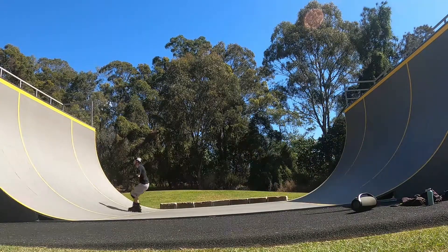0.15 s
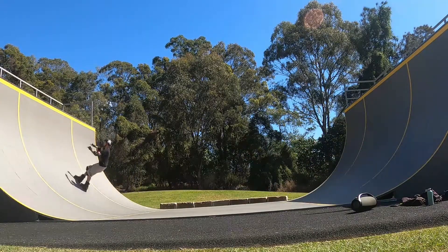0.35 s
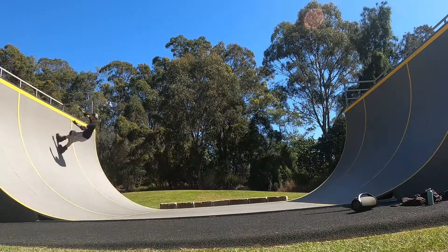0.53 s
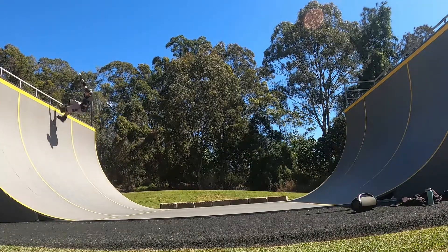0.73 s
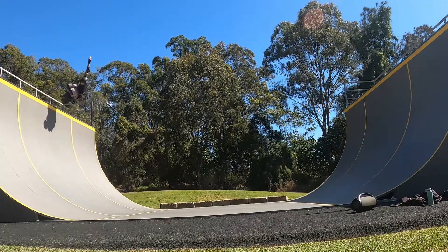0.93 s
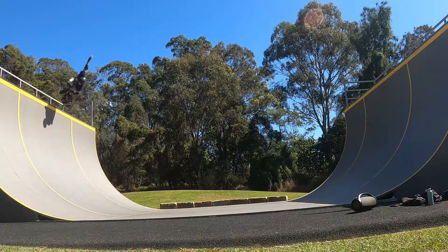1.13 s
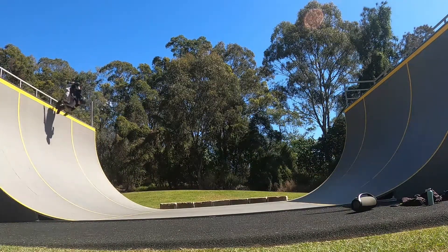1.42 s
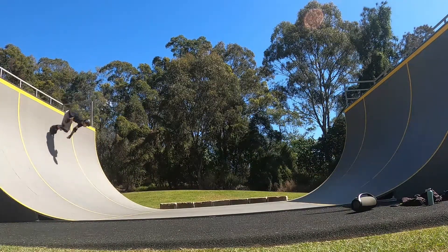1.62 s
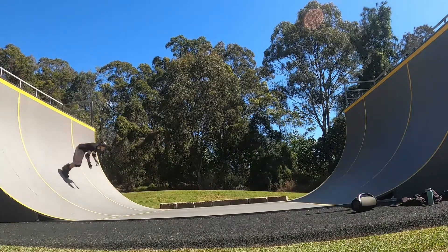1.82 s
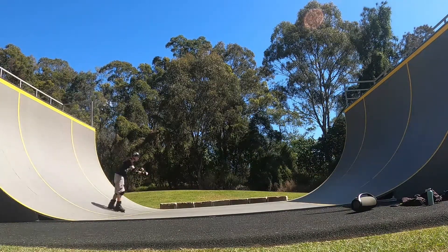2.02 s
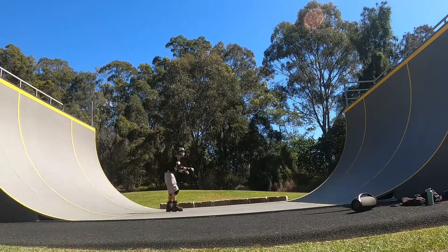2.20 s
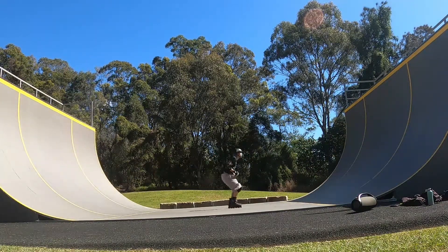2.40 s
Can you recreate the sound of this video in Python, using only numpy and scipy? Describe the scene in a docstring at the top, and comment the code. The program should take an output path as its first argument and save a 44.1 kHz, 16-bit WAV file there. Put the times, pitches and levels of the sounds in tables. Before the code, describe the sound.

Inline skate wheels rumble and knock up a hollow outdoor half-pipe. The sound eases during a jump, then the skates land with a sharp clack and roll back down. Light wind lies behind, and it all sounds somewhat muffled.

```python
"""Wheels rumble on a hollow deck as an inline skater climbs an outdoor half-pipe, flies above the lip,
lands with a clack and rolls back down. Bumps force the deck's resonances and grit excites a roar and
hiss in the skates, hardest in the curve; each blow leaves both in damped free vibration. In the air the
deck rumbles on and the free wheels whine, sagging as they slow. Light wind, trees and a far bird lie
behind. The sound is muffled, with a hollow ring above 1 kHz, and is heard at two microphone ports."""
import sys
import numpy as np
from scipy import signal
from scipy.fft import rfft, irfft
from scipy.io import wavfile
from scipy.ndimage import uniform_filter1d

SR = 44100
rng = np.random.default_rng(int(sys.argv[2]) if len(sys.argv) > 2 else 0)


def master_out(mix):
    """Clip the mix to full scale and print it as 16-bit PCM to the path in sys.argv[1]."""
    frames = np.transpose(np.atleast_2d(mix))
    ceiling = np.clip(frames, -1, 1)
    pcm = np.round(ceiling * 32767).astype(np.int16)
    wavfile.write(sys.argv[1], SR, pcm)


N = 112455

# wheel contact going up and coming down: t/s, deck rumble/dB, roar/dB, hiss/dB, deep boom/dB
CLIMB_CONTACT = [(0, -38.5, -62, -70, -32), (0.102, -38, -89, -72.5, -54), (.23, -41, -61, -73.5, -42),
                 (0.299, -45, -61, -76, -38), (0.314, -53, -49.5, -59, -43.5),
                 (0.369, -28.5, -56.5, -61.5, -35.5), (0.44, -31, -48.5, -61.5, -38),
                 (.52, -30.5, -42.5, -53.5, -38.5), (0.632, -28, -45.5, -54, -38.5),
                 (0.709, -29, -46, -54, -33.5), (0.81, -34.5, -57.5, -67, -43.5),
                 (0.999, -43, -66, -70, -47), (1.14, -46.5, -68, -78, -43),
                 (1.3, -51.5, -83.5, -104.5, -53)]
DESCENT_CONTACT = [(1.725, -34, -45.5, -50, -36), (1.786, -29, -44, -54.5, -30),
                   (1.849, -31, -53, -63.5, -43), (1.955, -39, -54, -65.5, -39.5),
                   (1.965, -35.5, -46.5, -56, -36.5), (2.108, -26, -44, -49, -44),
                   (2.23, -30.5, -47.5, -59, -33.5), (2.352, -32.5, -58, -65.5, -40),
                   (2.55, -43, -64.5, -77, -33)]
# low and high modes of the deck, narrow modes of the skates: f/Hz, bandwidth/Hz, relative level/dB
DECK_LOW_MODES = [(63.8, 6.7, -1.5), (97.7, 20, -1), (129.7, 44, -0.5), (179.3, 26, 2.5), (209, 12, -5),
                  (297, 29, -11.5)]
DECK_HIGH_MODES = [(290, 25, 0.5), (399, 200, -3.5), (485, 21, -11.5)]
SKATE_MODES = [(948, 30, -2), (1094, 20, 2), (1210, 20, -3), (1317, 30, -1), (1615, 30, -3), (1951, 20, -3),
               (2256, 20, -3), (3080, 100, -4), (5200, 100, -8)]
# spectral envelopes of the noises and impacts: f/Hz, relative spectral level/dB
ROAR_SPECTRUM = [(640, -18.5), (760, -19), (920, -9.5), (1090, 0.5), (1200, -5.5), (1350, 0.5), (1560, -11),
                 (1750, -17), (2300, -21.5)]
HISS_SPECTRUM = [(1180, -35.5), (2000, -33.5), (2660, -10), (3100, 2.5), (3330, -4.5), (3750, -9),
                 (4110, -1), (4330, -9.5), (4580, 3), (5160, 0.5), (5780, -7), (5940, -14.5), (6470, -12),
                 (7210, -27), (7760, -24), (10100, -53), (17100, -120)]
WIND_SPECTRUM = [(25, -33), (45, -5.5), (65, 4), (92, 7), (130, -2.5), (200, -6.5), (300, -16.5),
                 (400, -17), (520, -39), (700, -37.5)]
TREE_SPECTRUM = [(720, -26.5), (900, -9.5), (1080, 2.5), (1330, 4.5), (1500, 2.5), (1680, -8), (2200, -15),
                 (2800, -12.5), (3400, -8.5), (4200, -11), (5100, -8), (5800, -22.5), (6150, -21),
                 (6500, -27.5), (8000, -43.5), (11000, -54)]
THUD_SPECTRUM = [(30, -25), (80, -27.5), (130, -5.5), (165, 1), (260, -7), (370, -22.5), (500, -19.5),
                 (700, -38.5), (1200, -60.5)]
CLACK_SPECTRUM = [(500, -18.5), (730, -15.5), (950, -6.5), (1100, -4.5), (1230, -18), (1420, -8.5),
                  (1750, -12.5), (2200, -18), (2500, -19.5), (3080, -11), (4000, -19), (5100, -19),
                  (6550, -19.5), (7200, -28), (8300, -41.5), (10000, -47.5), (12500, -63)]
TAP_SPECTRUM = [(1100, -2), (1300, 3), (1550, -3), (1900, 0), (2300, -9), (3100, -7), (4000, -18)]
# wheel rotation: t/s, speed/take-off speed
WHEEL_SPIN = [(1.1, 1), (1.48, .993), (1.56, 1), (1.7, .985)]
# tones of the free bearings: f/Hz, wander width/Hz, level/dB, swell time/s, swell/dB
BEARING_TONES = [(1124, 6, -65, 1.61, 4), (1322, 7, -64.5, 1.22, 3.5), (1507, 7, -64.5, 1.42, 4.5)]
# sizzle of the wheels on the flat: f/Hz, bandwidth/Hz, relative level/dB
SIZZLE_BANDS = [(6150, 500, 0), (6900, 700, -6), (7900, 900, -7), (9300, 1200, -17)]
# hum of the curved panels: t/s, f/Hz, level/dB
PANEL_HUM = [(0.242, 92.53, -49), (.275, 97.3, -30.5), (0.299, 107.6, -29), (0.313, 144, -27.5),
             (0.389, 150.1, -30), (0.439, 163.2, -37), (0.479, 165.1, -26), (.54, 175.6, -28.5),
             (0.619, 178.2, -38.5), (0.721, 177, -45), (0.852, 169, -79)]
# wheel slips in the curve and at touchdown: t/s, level/dB
WHEEL_SLIPS = [(.302, -49), (.331, -54), (.499, -43), (0.527, -43), (.576, -49), (.597, -50), (.622, -47.5),
               (1.72, -37), (2.018, -50), (2.085, -46), (2.105, -47), (2.12, -44.5)]
# skates striking the deck: t/s, relative thud level/dB, relative clack level/dB
IMPACTS = [(0.303, -21.5, -29.5), (0.471, -12, -21), (0.499, -12, -16), (0.528, -6.5, -17),
           (.576, -15, -16), (.616, -12.5, -14), (0.658, -16, -14.5), (0.73, -7.5, -26), (1.7186, -3, -4),
           (1.731, 1, -3.5), (1.7439, -5, -2.5), (1.771, -5, -14), (1.8169, -6, -21.5), (1.841, -8.5, -19),
           (1.959, -27.5, -20.5), (2.15, -5.5, -18)]
# modes of ramp and skates left ringing by a blow: f/Hz, relative level/dB, T60/s
IMPACT_MODES = [(232, 9, .08), (339, 2, .17), (505, 4, .06), (940, -8, .2), (1093, -1, .4), (1394, -9, .3),
                (1625, -12, .2), (1951, -7, .13), (2256, -6, .14), (3090, -5, .05)]
# far bird whistles: t/s, duration/s, start f/Hz, end f/Hz, arch/Hz, level/dB
BIRD_NOTES = [(.92, .37, 6110, 6100, 0, -82), (1.272, .09, 6250, 5650, 170, -71),
              (1.405, 0.115, 4720, 4510, -35, -66)]
# dry taps in mid-air: t/s, level/dB
AIRBORNE_TAPS = [(1.194, -54)]
# two microphone ports: f/Hz, left minus right/dB, left lead/rad, diffuse share/dB
PORT_RESPONSE = [(97, 1.5, 0.02, -29), (400, 2, 0.22, -23), (750, 4, 0.07, 2.5), (1060, 1.5, 0.5, -16),
                 (1350, 8.5, 1, -13), (1700, -4.5, -0.5, -12.5), (2170, 0.5, -1.3, -7),
                 (2830, 11.5, -1.3, -14.5), (3330, 0, -0.5, -5), (4150, -6.5, -0.1, 2),
                 (4900, -15, -2, -7.5), (5400, -6, 0.3, -3), (6510, -4.5, 1.25, -4.5), (7870, 14.5, 1, -10)]

TAKE_OFF_S, LANDING_S = .8, DESCENT_CONTACT[0][0]
RUMBLE_COLUMN, ROAR_COLUMN, HISS_COLUMN, BOOM_COLUMN = 1, 2, 3, 4
t = np.arange(N) / SR
f = np.maximum(np.arange(N + 1) * SR / (2 * N), 1)


def undb(db):
    """Amplitude ratio of a level in decibels."""
    return 10 ** (np.asarray(db) / 20)


def unit(x):
    """Normalisation to rms 1."""
    return x / np.sqrt(np.mean(x ** 2))


def noise():
    """Gaussian white noise."""
    return rng.standard_normal(N)


def wander(per_s):
    """Smoothed random steps give a slow modulation with a spread near 1."""
    hold = int(SR / per_s)
    steps = np.repeat(noise()[:N // hold + 1], hold)
    return 1.17 * uniform_filter1d(uniform_filter1d(steps, hold), hold)[:N]


def through(x, response):
    """Linear filtering: the spectrum is multiplied by a frequency response."""
    return irfft(rfft(x, 2 * N) * response)[..., :N]


def across(points, column=1):
    """Interpolation of a table column along log frequency."""
    rows = np.array(points, float)
    return np.interp(np.log(f), np.log(rows[:, 0]), rows[:, column])


def colour(points):
    """Minimum-phase response of a spectral envelope, falling 24 dB per octave beyond its ends."""
    outside = np.maximum(points[0][0] / f, 1) * np.maximum(f / points[-1][0], 1)
    cepstrum = irfft(np.log(undb(across(points)) / outside ** 4 + 1e-6))
    return np.exp(rfft(np.r_[cepstrum[0], 2 * cepstrum[1:N]], 2 * N))


def resonance(hz, width):
    """Response of a damped oscillator, gain 1 at its centre."""
    return 1 / (1 + 1j * (f / hz - hz / f) * hz / width)


def fade(start, decay_s):
    """Exponential decay from a sudden onset."""
    age = t - start
    return (age >= 0) * np.exp(-np.maximum(age, 0) / decay_s)


def scatter(decay_s):
    """Reverberation: the response of dense decaying reflections, energy 1."""
    return rfft(unit(noise() * fade(0, decay_s)) / np.sqrt(N), 2 * N)


def drive(force, gain, body):
    """Forced vibration: a force of changing strength excites a body of unit mean power gain."""
    return through(force * gain, body / np.sqrt(np.mean(abs(body) ** 2)))


def contact(column):
    """Excitation strength of one rolling layer: the climb, with the descent added from the landing on."""
    climb, descent = (undb(np.interp(t, run[:, 0], run[:, column]))
                      for run in (np.array(CLIMB_CONTACT), np.array(DESCENT_CONTACT)))
    return climb + descent * (t >= LANDING_S)


def panels(modes, gain, top_hz, bottom_hz=43.5):
    """Random bumps excite a band of deck modes, whose powers add."""
    passband = 1 / np.sqrt((1 + (f / top_hz) ** 20) * (1 + (bottom_hz / f) ** 6))
    power = sum(abs(undb(db) * resonance(hz, width)) ** 2 for hz, width, db in modes)
    return drive(noise(), gain, passband * np.sqrt(power))


def deck(split_hz=120):
    """Forced vibration of the hollow deck: a boom, a rumble and higher modes that need hard contact."""
    boom_modes = [mode for mode in DECK_LOW_MODES if mode[0] < split_hz]
    rumble_modes = [mode for mode in DECK_LOW_MODES if mode[0] >= split_hz]
    boom = panels(boom_modes, contact(BOOM_COLUMN), top_hz=2 * split_hz)
    rumble = panels(rumble_modes, contact(RUMBLE_COLUMN), top_hz=336)
    hard_contact = undb(-8) * np.sqrt(contact(RUMBLE_COLUMN) * contact(ROAR_COLUMN))
    return boom + rumble + panels(DECK_HIGH_MODES, hard_contact, top_hz=553)


def skate_ring():
    """Lightly damped skate modes add narrow peaks to rolling and clacks alike."""
    return 1 + sum(undb(db - .5) * resonance(hz, width) for hz, width, db in SKATE_MODES)


def grit(per_s, spread_db):
    """Shot noise: grains meet the wheels as impulses at random times."""
    impulses = (rng.random(N) < per_s / SR) * np.sign(noise())
    return impulses * undb(spread_db * np.minimum(rng.exponential(size=N), 4))


def rolling():
    """Roughness excitation: grit rings the skates in a roar and a hiss; the wheels judder and scuff."""
    judder = undb(1.49 * wander(per_s=110))
    bumps = unit(grit(per_s=4000, spread_db=3) * judder)
    ticks = unit(grit(per_s=2000, spread_db=0) * judder)
    roar = drive(bumps, contact(ROAR_COLUMN), colour(ROAR_SPECTRUM) * skate_ring())
    hiss = drive(ticks, contact(HISS_COLUMN), colour(HISS_SPECTRUM) * skate_ring())
    return roar + hiss + scuffs(judder)


def wind_and_trees():
    """Broadband noise of moving air: low, gently gusting wind and a steady wash of trees."""
    gusts = undb(-39.5 + 1.2 * wander(per_s=7.91))
    wind = unit(through(noise(), colour(WIND_SPECTRUM))) * gusts
    trees = unit(through(noise(), colour(TREE_SPECTRUM))) * undb(-61)
    return wind + trees


def bearings(unload_s=.26, swell_s=.1, loaded_db=-9.5):
    """Bearing tones follow rotation speed; they swell in turn and are loudest with the wheels free."""
    free = np.clip((t - TAKE_OFF_S) / unload_s + 1, 0, 1) * (t < LANDING_S)
    spin = np.interp(t, *np.array(WHEEL_SPIN).T)
    whine = 0
    for hz, width, db, swell_at, swell_db in BEARING_TONES:
        swell = swell_db * np.exp(-((t - swell_at) / swell_s) ** 2)
        gain = undb(db + swell + 1.8 * wander(per_s=40))
        pitch = hz * spin + width / 2 * wander(per_s=40)
        whine += gain * np.sin(2 * np.pi * np.cumsum(pitch) / SR)
    return np.sqrt(2) * whine * undb(loaded_db * (1 - free))


def sizzle(start_s=.04, length_s=.25):
    """Band-limited rolling noise swells and fades, light and high, as the wheels cross the flat."""
    progress = np.clip((t - start_s) / length_s, 0, 1)
    body = sum(undb(db) * resonance(hz, width) ** 2 for hz, width, db in SIZZLE_BANDS)
    return drive(noise(), undb(-81) * np.sin(np.pi * progress), body)


def panel_hum():
    """The curved panels vibrate in a wavering tone whose frequency rises as the wheels climb them."""
    times, hz, db = np.array(PANEL_HUM).T
    pitch = np.interp(t, times, hz) * (1 + .04 * wander(per_s=35))
    gain = undb(np.interp(t, times, db) + 2 * wander(per_s=35))
    return np.sqrt(2) * gain * np.sin(2 * np.pi * np.cumsum(pitch) / SR)


def scuffs(judder):
    """Sliding friction: each wheel slip gives a short burst of treble noise."""
    slips = sum(undb(db) * fade(start, decay_s=.012) for start, db in WHEEL_SLIPS)
    return drive(noise() * judder, slips, resonance(hz=5330, width=980) * colour(HISS_SPECTRUM))


def thuds(peak_db=-14):
    """Impulse response of the hollow deck: each blow thumps it and the rest of the deck reverberates."""
    impulses = np.zeros(N)
    for start, thud_db, _ in IMPACTS:
        impulses[int(start * SR)] += undb(thud_db)
    boom = undb(-7.5) * scatter(decay_s=.097)
    thud = through(impulses, colour(THUD_SPECTRUM) * (1 + boom))
    return undb(peak_db) * thud / abs(thud).max()


def clacks(clack_s=.0032, rattle_s=.03):
    """Impact noise: wheels and frame clack and rattle briefly; overlapping blows add in power."""
    power = sum((undb(db) * (fade(start, clack_s) + undb(-5) * fade(start, rattle_s))) ** 2
                for start, _, db in IMPACTS)
    return drive(noise(), undb(-36) * np.sqrt(power), colour(CLACK_SPECTRUM) * skate_ring())


def impact_ringing(rise_s=.001):
    """Free vibration: each blow leaves ramp and skates ringing as a sum of damped sinusoids."""
    out = np.zeros(N)
    for start, _, clack_db in IMPACTS:
        onset = int(start * SR)
        age = t[:min(N - onset, SR // 2)]
        phases = rng.random(len(IMPACT_MODES))
        ring = sum(undb(db - 60 * age / t60) * np.sin(2 * np.pi * (hz * age + phase))
                   for (hz, db, t60), phase in zip(IMPACT_MODES, phases))
        attack = 1 - np.exp(-age / rise_s)
        out[onset:onset + len(age)] += undb(clack_db - 39) * ring * attack
    return out


def bird():
    """Frequency-modulated whistles flutter, level or falling, blurred by scattering among the trees."""
    flutter = undb(2.5 * wander(per_s=60))
    waver_hz = 22 * wander(per_s=60)
    song = 0
    for start, length, from_hz, to_hz, arch_hz, db in BIRD_NOTES:
        progress = np.clip((t - start) / length, 0, 1)
        arch = np.sin(np.pi * progress)
        pitch = from_hz + (to_hz - from_hz) * progress + arch_hz * arch + waver_hz
        song += undb(db) * arch * np.sin(2 * np.pi * np.cumsum(pitch) / SR)
    return through(song * flutter, 1 + .5 * scatter(decay_s=.03))


def tap():
    """A heavily damped transient: one faint dry tap while the skater is in the air."""
    envelope = sum(undb(db) * fade(start, decay_s=.012) for start, db in AIRBORNE_TAPS)
    return drive(noise(), envelope, colour(TAP_SPECTRUM))


def ports(direct, diffuse):
    """Level and phase differences between two ports, small in the bass, give the stereo image."""
    level_db, lead_rad, diffuse_db = (across(PORT_RESPONSE, column) for column in (1, 2, 3))
    right_over_left = undb(-level_db) * np.exp(-1j * lead_rad)
    left = 2 / (1 + right_over_left)
    side = through(diffuse, undb(diffuse_db))
    return through(direct, np.array([left, left * right_over_left])) + np.array([side, -side])


def scene():
    """Superposition of skater, ramp and surroundings as a direct and an uncorrelated diffuse field."""
    direct, diffuse = (deck() + rolling() + clacks() + tap() + bearings() + wind_and_trees() + sizzle()
                       for _ in range(2))
    return ports(direct + panel_hum() + thuds() + impact_ringing() + bird(), diffuse)


def record(dry):
    """Band limiting: a steep elliptic low-pass removes the treble above 15.5 kHz."""
    return signal.sosfilt(signal.ellip(8, .2, 70, 15500, fs=SR, output="sos"), dry)


dry = scene()
out = record(dry)
master_out(out)
```